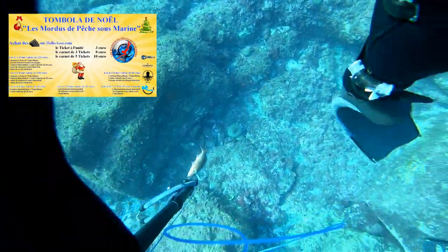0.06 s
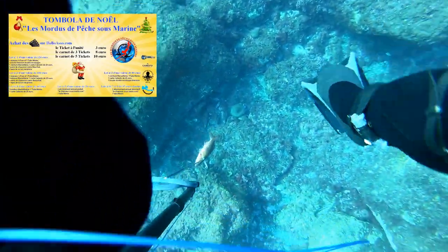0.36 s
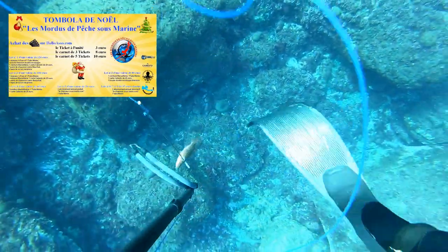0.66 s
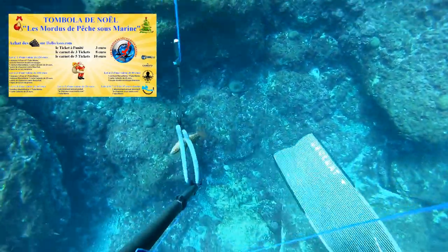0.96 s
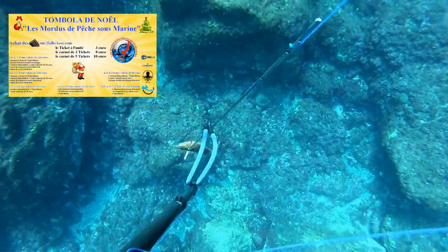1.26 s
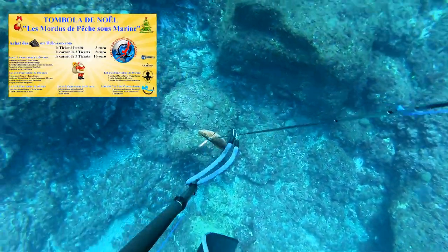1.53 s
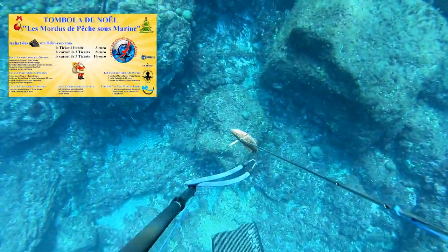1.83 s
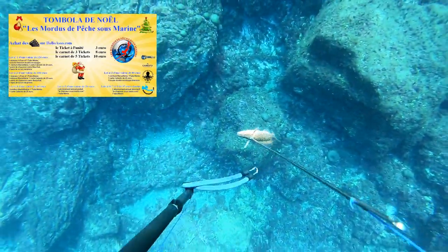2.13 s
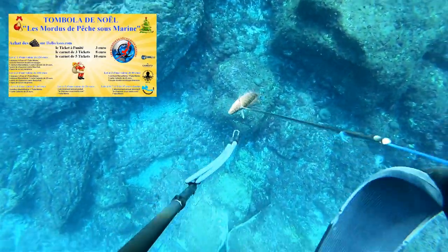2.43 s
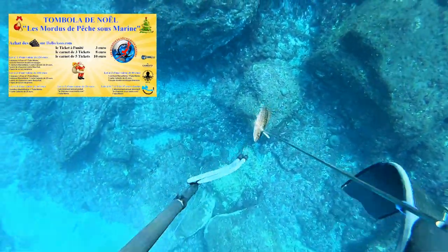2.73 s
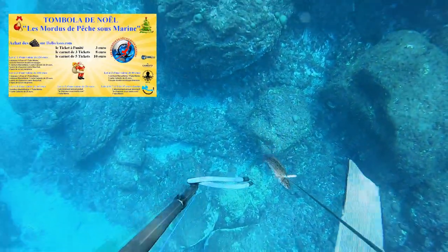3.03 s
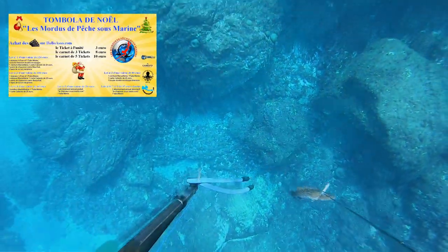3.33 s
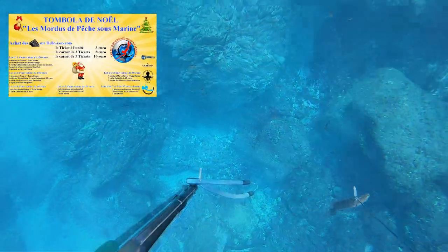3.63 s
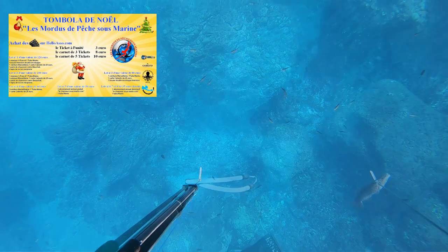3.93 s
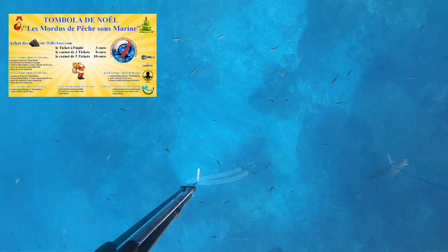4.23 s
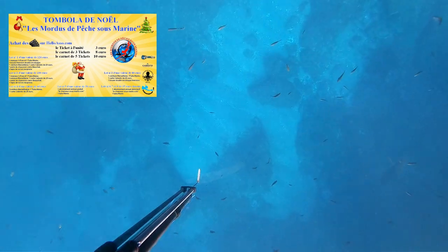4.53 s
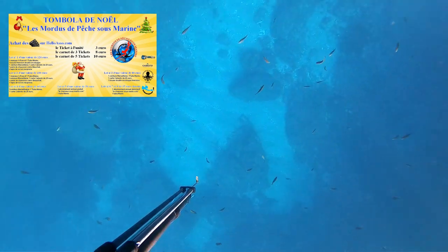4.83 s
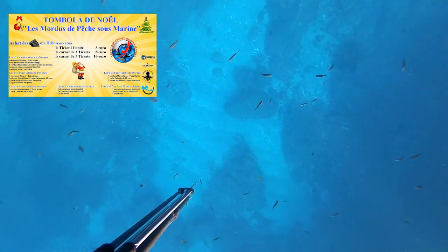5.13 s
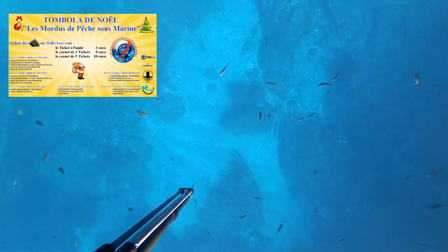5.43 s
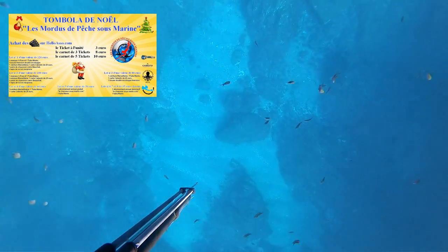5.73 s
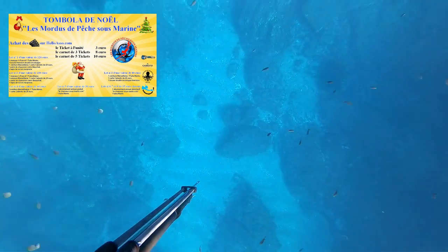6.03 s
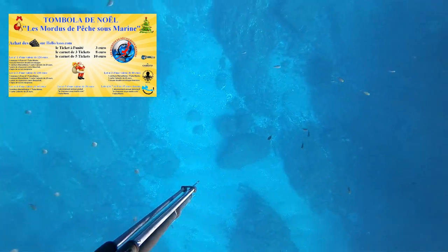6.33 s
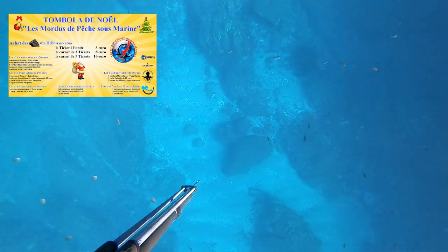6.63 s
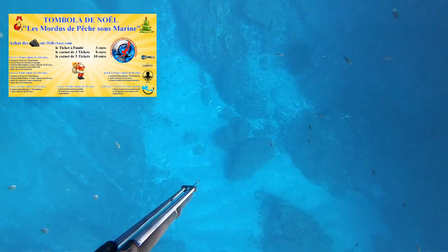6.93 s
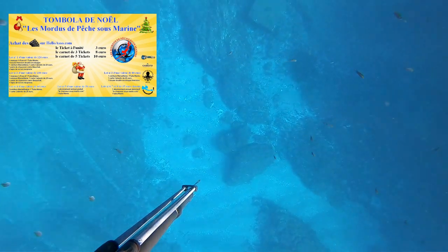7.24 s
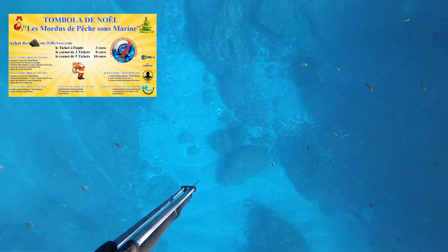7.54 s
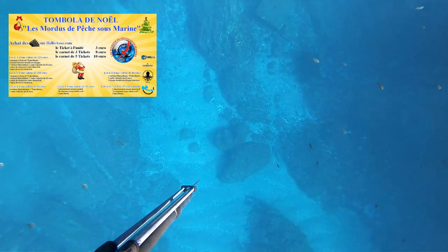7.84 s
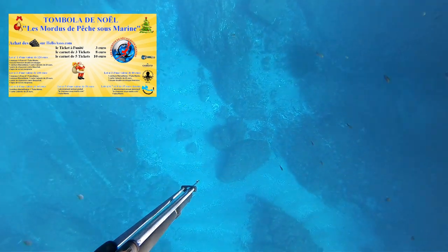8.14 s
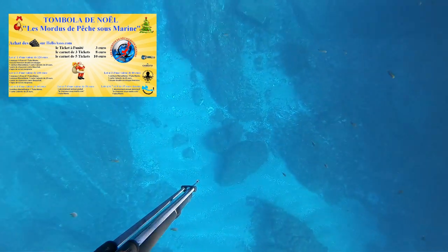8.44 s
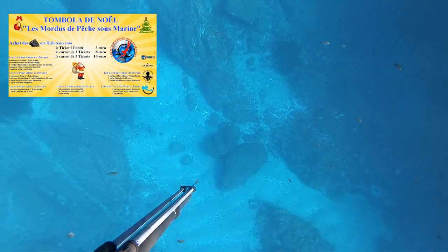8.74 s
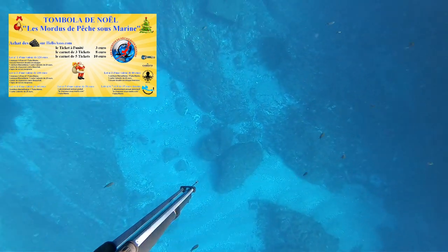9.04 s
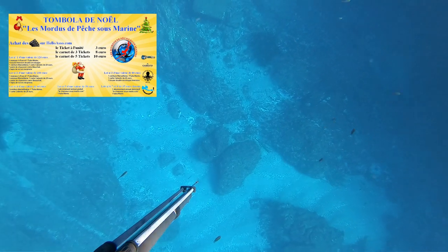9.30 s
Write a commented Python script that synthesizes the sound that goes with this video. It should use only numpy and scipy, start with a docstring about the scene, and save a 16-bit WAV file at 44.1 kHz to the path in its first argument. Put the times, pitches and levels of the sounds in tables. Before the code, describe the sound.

The sound is heard underwater by a reef, from inside a rising diver's sealed camera housing. A deep, muffled water rumble runs throughout, surging at about 0.3 and 1.4 seconds. Gear knocks and scrapes on the case in the first half second, again near 1 second and at 3.6. Pockets of air glug past, thickest from 1 to 2 seconds. A speargun line rasps and whirrs faintly from 0.5 to about 3 seconds. Between 2 and 3 seconds the sound opens from near mono into stereo, and distant snapping shrimp begin to crackle, strongest around 5 seconds, with sharp nearby snaps standing out. Soft froth sloshes close by, and from 4 seconds small bubbles pop, blip and ring. After one more shove of water at 5.4 seconds the rumble eases, swelling briefly near 8, while crackle and bubbles continue until the end, just past 9 seconds.

```python
"""Under the sea by a reef, heard from the two microphone ports of a rising diver's sealed camera housing.
Right on the case, water rumbles, gear knocks and scrapes, pockets of air glug past and a speargun
line rasps as it runs out. Close by, froth sloshes and small bubbles ring as they break free.
Farther off, snapping shrimp crackle as their cavities collapse, with single near snaps standing out.
The sound starts almost mono and opens into stereo."""
import sys
import numpy as np
from scipy import signal
from scipy.fft import rfft, irfft, next_fast_len
from scipy.io import wavfile
from scipy.ndimage import uniform_filter1d

SR = 44100
rng = np.random.default_rng(int(sys.argv[2]) if len(sys.argv) > 2 else 0)


def generate_wav(sig):
    """Save sig (samples, or channels by samples) to the path in sys.argv[1] as 16-bit PCM at SR."""
    pcm = np.round(np.clip(np.atleast_2d(sig).T, -1, 1) * 32767).astype(np.int16)
    wavfile.write(sys.argv[1], SR, pcm)


N = 413216
TIME = np.arange(N) / SR


def amp(db):
    """Decibels to gain."""
    return 10 ** (np.asarray(db) / 20)

def unit(x):
    """Scales to rms 1."""
    return x / np.sqrt(np.mean(x ** 2) + 1e-20)

def read(points, hz):
    """Reads a spectrum on a log-frequency axis."""
    f, value = np.transpose(points)
    return np.interp(np.log(hz + 1), np.log(f + 1), value)

def follow(curve):
    """A (time, value) curve at every sample."""
    return np.interp(TIME, *np.transpose(curve))

def add(mix, s, sound):
    """Adds a sound into the mix at time s."""
    part = mix[..., max(round(s * SR), 0):][..., :sound.shape[-1]]
    part += sound[..., :part.shape[-1]]

def colour(x, points):
    """Causal filter with the given spectrum, so that clicks ring after their onset only."""
    log_gain = np.log(amp(read(points, abs(np.fft.fftfreq(8192, 1 / SR)))))
    taps = np.fft.ifft(np.exp(np.conj(signal.hilbert(log_gain)))).real[:4096]
    return signal.oaconvolve(x, taps.reshape((1,) * (x.ndim - 1) + (-1,)), axes=-1)[..., :x.shape[-1]]

def butter(order, hz, kind="low"):
    """Butterworth filter sections."""
    return signal.butter(order, hz, kind, fs=SR, output="sos")

def band(x, hz, spread, order=2):
    """A broad resonance from hz / spread to hz * spread."""
    return signal.sosfilt(butter(order, [hz / spread, min(hz * spread, SR / 2 - 1)], "band"), x)

def resonate(x, hz, width_hz, stages=1):
    """Resonances of gain 1, in series, that follow the curve hz."""
    turn = np.exp(2j * np.pi * np.cumsum(hz) / SR)
    pole = np.exp(-np.pi * width_hz / SR)
    for _ in range(stages):
        x = 2 * (turn * signal.lfilter([1 - pole], [1, -pole], x / turn + 1e-18)).real
    return x

def clicks(per_s, spread_db):
    """Random impulses; a few are much larger, or smaller if spread_db is negative."""
    size = amp(spread_db * np.minimum(rng.exponential(1, N), 4.5))
    return size * rng.choice([-1, 1], N) * (rng.random(N) < per_s / SR)

def shower(sound, per_s, spread_db):
    """Repeats a sound at random times and strengths."""
    return signal.oaconvolve(clicks(per_s, spread_db), sound)[:N]

def steadied(x, seconds):
    """Evens out the slow swells of a noise."""
    return x / np.sqrt(abs(uniform_filter1d(x ** 2, int(seconds * SR))) + 1e-12)

def waver(per_s, depth_db):
    """A gain that wanders at random."""
    knots = rng.standard_normal(2000)
    return amp(depth_db * np.interp(TIME * per_s, np.arange(len(knots)), knots))

def bursts(rows, rise_s, fall_s):
    """A gain that swells to each (time, level) peak and dies away."""
    return sum(amp(db) * np.exp(-np.maximum((s - TIME) / rise_s, (TIME - s) / fall_s).clip(max=60))
               for s, db in rows)

def ring(t, hz, t60, onset_s, glide=0):
    """A damped swing; its pitch slides by the share glide as it dies."""
    age = t / max(t60, .003)
    turns = hz * np.cumsum(1 + glide * (np.minimum(age, 1) - .2)) / SR
    return np.sin(2 * np.pi * turns) * 1000 ** -age * (1 - np.exp(-t / onset_s))


# flow on the housing, strong while the fins drive, dying away in the glide: (time [s], level [dB])
FLOW_LEVEL = [(0, -34), (.28, -18), (.56, -30), (.88, -31), (1.48, -24.5), (1.9, -30), (2.85, -29.5),
              (3.45, -35.5), (4.2, -31.5), (5.2, -29.5), (6.3, -34), (7.0, -41.5), (7.42, -42.5),
              (7.66, -35), (8.1, -41.5), (8.28, -30), (8.55, -43), (9.37, -42.5)]
# trapped air churning, settling once most has escaped: (time [s], level [dB])
CHURN_LEVEL = [(0, -47), (.28, -29), (.55, -50), (.73, -40), (.9, -47.5), (1.1, -37), (1.45, -34.5),
               (1.85, -48), (2.05, -35.5), (2.7, -37.5), (3.35, -47.5), (3.78, -36.5), (4.0, -41),
               (4.7, -43.5), (5.1, -37), (5.95, -44), (6.75, -63.5), (9.37, -55)]
# sudden shoves of water on the housing: (time [s], rumble [dB], churn [dB])
WATER_SHOVES = [(1.048, -32, -34), (1.439, -18, -47), (1.952, -30, -26), (2.377, -37, -32),
                (3.78, -53, -39), (5.433, -23, -70), (5.58, -48, -64), (7.951, -37.5, -55),
                (8.221, -39, -38), (8.576, -38.5, -41), (8.799, -54, -36)]
# deep swell, eddies and churn at the microphones: (frequency [Hz], level [dB])
SWELL_SPECTRUM = [(10, -6.5), (22, -3.5), (32, -10.5), (45, -8.5), (62, -11), (90, -44.5), (250, -79.5),
                  (800, -95)]
EDDY_SPECTRUM = [(26, -17.5), (44, 11), (75, 7), (105, -11.5), (250, -26), (800, -60.5)]
CHURN_SPECTRUM = [(50, -34), (85, 0), (125, -1), (150, -2), (190, -15), (250, -26), (320, -18.5),
                  (450, -38.5), (1000, -86)]
# note of the trapped air, sinking as it swells on the way up: (time [s], pitch [Hz])
AIR_PITCH = [(0, 150.6), (4.4, 138), (4.9, 108), (5.9, 108), (7.3, 97.5), (9.3, 89)]
# its second resonance: (time [s], level [dB])
AIR_OVERTONE = [(0, -16), (1.4, -17), (2.8, -16), (4.2, -17), (5, -24), (6.3, -21), (9.3, -22)]

def flow(rumble_db=-4, churn_db=-4, note_db=-5, overtone_ratio=1.607, swell_top_hz=46, muffle_hz=1800):
    """Water presses on the case; faster flow sheds more eddies, and shaken air hums at its own note."""
    times, push_db, shake_db = np.transpose(WATER_SHOVES)
    rise_s, fall_s = 0.0097, 0.021
    speed = amp(follow(FLOW_LEVEL)) + bursts(zip(times, push_db), rise_s, fall_s)
    shake = amp(follow(CHURN_LEVEL)) * waver(per_s=13, depth_db=4)
    shake += bursts(zip(times, shake_db), rise_s, fall_s)
    swell = steadied(colour(rng.standard_normal(N), SWELL_SPECTRUM), 0.09)
    swell = signal.sosfilt(butter(4, swell_top_hz), swell)
    eddies = steadied(colour(rng.standard_normal(N), EDDY_SPECTRUM), 0.32)
    eddy_db = -4 + 2 * np.minimum(20 * np.log10(speed) + 29.8, 2)
    rumble = (swell + eddies * amp(eddy_db)) * speed * amp(rumble_db)
    note_hz = follow(AIR_PITCH)
    churn = steadied(colour(clicks(per_s=110, spread_db=2), CHURN_SPECTRUM), 0.21)
    note = resonate(colour(clicks(per_s=80, spread_db=-2), CHURN_SPECTRUM), note_hz, width_hz=18)
    overtone = resonate(clicks(per_s=53, spread_db=3.5), overtone_ratio * note_hz, width_hz=60, stages=2)
    air = amp(churn_db) * churn + amp(note_db) * steadied(note, 0.054)
    air += amp(follow(AIR_OVERTONE)) * steadied(overtone, 0.51)
    return signal.sosfilt(butter(2, muffle_hz), rumble + air * shake)


# gear striking the case itself, and at 5.85 s a thump of air gulping at the housing: (time [s], level [dB],
# centre [Hz], crack t60 [s], thud [dB])
GEAR_KNOCKS = [(0.159, -29.5, 1800, 0.013, -16), (0.2206, -22, 1370, 0.075, -40.5),
               (0.2197, -16, 740, 0.027, -7.5), (0.234, -43, 2580, 0.02, -40),
               (0.2729, -23, 1560, 0.034, -27), (0.282, -17, 1620, 0.03, -28),
               (0.4727, -30, 2770, 0.034, -60), (1.026, -18.5, 2090, 0.042, -44),
               (1.455, -32, 2220, 0.016, -50), (1.493, -28, 2500, 0.015, -50),
               (1.5885, -32, 810, 0.05, -44), (2.275, -29, 1320, 0.017, -26),
               (2.365, -28.5, 1410, 0.016, -21), (3.606, -17.5, 1170, 0.063, -34),
               (5.006, -31.5, 674, 0.049, -47), (5.854, -22.5, 245, 0.0023, -29)]
# the pitches a knock rings at, from a low clunk to a bright clink: (frequency [Hz], level [dB])
KNOCK_MODES = [(334, -5), (619, 1), (790, -3), (1152, -2), (1314, -3.5), (1470, -3), (2070, -5.5),
               (2401, -10.5), (2756, -7), (3774, -5)]
# gear rubbing on the case: (peak time [s], level [dB], centre [Hz], rise [s], fall [s])
GEAR_SCRAPES = [(.11, -49.5, 289, 0.3, 0.17), (0.135, -36.5, 600, 0.0045, 0.0089),
                (.125, -50, 1800, .003, .025), (0.231, -33, 265, 0.0015, 0.01),
                (0.28, -32.5, 2120, 0.016, 0.014), (.283, -38.5, 810, 0.02, 0.027),
                (.285, -41, 7500, 0.013, 0.022), (.755, -47, 3430, 0.058, 0.03),
                (.33, -50.5, 1240, 0.063, 0.08), (.995, -42.5, 1150, 0.0046, 0.043),
                (1.1, -38, 3340, 0.03, 0.022), (1.375, -30, 4500, 0.0045, 0.004),
                (1.588, -38.5, 2450, 0.0028, 0.0072), (2.051, -37.5, 3320, 0.0064, 0.027)]
# the wall muffles the gear on its way to the microphones: (frequency [Hz], gain [dB])
HOUSING_WALL = [(20, 12), (3000, -3.5), (6000, -12.5), (10000, -17.5), (15000, -44.5)]

def gear(thud_hz=46, crack_db=-5, ring_db=-2, ring_stretch=1.56, grit_db=-30):
    """Knocks crack, ring near their own pitch and rock the case on its mount; scrapes are tiny slips."""
    out, t = np.zeros(N), np.arange(SR // 2) / SR
    for s, db, hz, t60, thud_db in GEAR_KNOCKS:
        crack = band(rng.standard_normal(len(t)) * 1000 ** (-t / t60), hz, spread=1.223)
        modes = np.zeros(len(t))
        for mode_hz, mode_db in KNOCK_MODES:
            nearness = np.exp(-(np.log(mode_hz / hz) / 0.43) ** 2)
            swing = ring(t, mode_hz, t60 * ring_stretch, onset_s=0.000047)
            modes += rng.choice([-1, 1]) * amp(mode_db) * nearness * swing
        add(out, s, amp(db + crack_db) * crack / abs(crack).max())
        add(out, s, amp(db + ring_db) * modes / abs(modes).max())
        add(out, s, amp(thud_db) * ring(t, thud_hz, t60=0.22, onset_s=0.029))
    for s, db, hz, rise_s, fall_s in GEAR_SCRAPES:
        slips = clicks(per_s=8400, spread_db=-3)
        rub = unit(band(slips, hz, spread=1.82, order=4))
        grit = unit(band(slips, 2 * hz, spread=1.6))
        out += bursts([(s, db)], rise_s, fall_s) * (rub + amp(grit_db) * grit)
    return colour(out, HOUSING_WALL)


# air breaking loose at the housing: (time [s], smack [dB], boom [dB], smack pitch [Hz], throat [dB])
SINGLE_GULPS = [(0.2256, -22, -18, 510, -12), (.336, -38, -23.5, 604, -27), (0.852, -28, -49, 710, -36),
                (1.039, -34, -18, 725, -46), (1.2, -35, -23, 500, -19.5), (1.214, -29.5, -15.5, 650, -22.5),
                (1.247, -36, -50, 800, -40), (1.289, -24.5, -19, 730, -33.5),
                (1.351, -27.5, -20.5, 670, -20), (1.4268, -21, -12.5, 730, -24),
                (1.455, -25.5, -24, 664, -24), (1.5, -33, -15.5, 500, -35), (1.542, -24.5, -15, 740, -34),
                (1.554, -39, -14.5, 650, -19), (1.572, -30, -30.5, 690, -31), (1.588, -22, -24.5, 684, -32),
                (1.618, -34, -20.5, 560, -28), (1.655, -38, -21, 710, -26), (1.698, -35, -35, 600, -45),
                (1.724, -33, -15.5, 504, -30), (1.743, -26, -25.5, 960, -39), (1.76, -26, -34, 692, -36),
                (1.946, -33.5, -33, 696, -34), (1.998, -29, -19.5, 690, -26), (2.018, -28, -46, 690, -40),
                (2.275, -26, -51, 740, -53), (2.367, -18, -24.5, 724, -22.5), (3.609, -30, -21, 590, -25),
                (3.633, -21, -26, 600, -32), (3.753, -51, -26, 600, -26)]
# quick runs of gulps: (time [s], length [s], first gap [s], gap to last gap [ratio], smack [dB],
# boom [dB], swell [dB/s], smack pitch [Hz])
GULP_RUNS = [(0.596, .122, .016, 1.06, -28.5, -18.5, 94, 472), (3.515, .087, .019, .87, -24, -35, 15, 554)]
# the pocket of air against the housing: (frequency [Hz], level [dB], share of the boom's t60 [ratio])
POCKET_MODES = [(145.2, -4.5, 0.97), (50.6, -13, 0.91), (236, -10.5, 0.078), (302, -13, 0.15)]

def glugs(smack_db=-1, spray_db=-17, boom_db=3, boom_lag_s=0.00353, single_t60=0.22, throat_hz=320.5):
    """A neck of water shuts with a smack and a little spray; it gargles and the air behind it booms."""
    out, t = np.zeros(N), np.arange(SR // 3) / SR
    gulps = [(s, hit_db, hz, 0.043, low_db, single_t60, throat_db)  # alone, the smack slides upward
             for s, hit_db, low_db, hz, throat_db in SINGLE_GULPS]
    run_chirp, run_t60 = -0.057, 0.042  # in a run, the smack sags and the boom is cut short
    for s, length, gap, ratio, hit_db, low_db, swell, hz in GULP_RUNS:
        ages = np.append(0, np.cumsum(gap * ratio ** np.arange(12)))
        for age in ages[ages < length]:
            up_db = swell * age
            gulps.append((s + age, hit_db + 0.55 * up_db, hz, run_chirp,
                          low_db + up_db, run_t60, low_db + up_db - 17))
    for s, hit_db, hz, chirp, low_db, t60, throat_db in gulps:
        pocket_tune, slow, smack_tune, throat_tune = rng.normal(1, [.03, .2, .04, .1])
        smack_s, smack_hz = 0.0011, hz * smack_tune
        age = t / (smack_s * slow)
        slide = 1 + chirp * (np.minimum(age, 4) / 2 - 1)
        smack = age ** 2 * np.exp(2 - 2 * age) * np.sin(2 * np.pi * smack_hz * t * slide)
        smack += amp(-10) * ring(t, smack_hz, 0.03 * t60 / single_t60, smack_s)
        spray = unit(band(rng.standard_normal(len(t)), 2 * hz, spread=1.7)) * np.exp(-t / 0.014)
        gargle = ring(t, throat_hz * throat_tune, t60=0.058, onset_s=0.006, glide=-.2)
        boom = sum(amp(db) * ring(t, mode_hz * pocket_tune, t60 * share, onset_s=0.0017)
                   for mode_hz, db, share in POCKET_MODES)
        add(out, s, amp(hit_db) * (amp(smack_db) * smack + amp(spray_db) * spray))
        add(out, s, amp(throat_db) * gargle)
        add(out, s + boom_lag_s, -amp(low_db + boom_db) * boom)
    return colour(out, [(50, 4.5), (850, 0), (1150, -12.5), (2500, -3.5), (5000, -31), (12000, -59)])


# the line running out under tension, heard through the housing: (time [s], level [dB])
LINE_LEVEL = [(.5, -70.5), (.63, -56.5), (.76, -55.5), (1.15, -49), (1.4, -49), (1.75, -52), (2.05, -49),
              (2.4, -52.5), (3.1, -58), (3.4, -100)]
# its rasp: (frequency [Hz], level [dB])
RASP_SPECTRUM = [(600, -26), (1400, -11.5), (2000, -2.5), (2500, -3), (2900, 7), (3400, -1.5), (3900, -17),
                 (5400, -25.5), (6500, -21.5), (9000, -23.5), (12000, -64.5), (16000, -82.5)]
# what it rings in the gun: (frequency [Hz], half-width of each stage [Hz], level [dB])
GUN_MODES = [(2110, 81, -19), (2820, 27, -3), (2896, 73, -7), (3140, 160, -6.5), (4190, 44, -12),
             (4590, 92, -13), (4900, 80, -18.5), (5300, 76, -14.5)]

def spear_line(level_db=-3, whirr_db=-2.5):
    """Tiny jerks of line rasp and set the gun whirring; changing tension sways strength and pitch."""
    slips = clicks(per_s=3000, spread_db=2.5) * waver(per_s=30, depth_db=3)
    drift = waver(per_s=9, depth_db=0.13)
    whirr = sum(amp(db) * unit(resonate(slips, hz * drift, 2 * half_width, stages=2))
                for hz, half_width, db in GUN_MODES)
    rasp = unit(colour(slips, RASP_SPECTRUM))
    return (rasp + amp(whirr_db) * unit(whirr)) * amp(follow(LINE_LEVEL) + level_db)


# froth streaming close past the ports: (time [s], level [dB])
FROTH_LEVEL = [(0, -65.5), (.7, -62.5), (.98, -47), (1.6, -45.5), (1.87, -54), (2.15, -44), (2.45, -54.5),
               (3.35, -56.5), (3.7, -53), (4.15, -59.5), (4.75, -52), (5.3, -44.5), (6.1, -49.5),
               (6.85, -56), (7.3, -50), (7.7, -52), (8.27, -45), (8.43, -54), (8.5, -41), (9.37, -49.5)]
# its tone: (frequency [Hz], level [dB])
FROTH_SPECTRUM = [(70, -28), (170, -0.5), (300, -9.5), (420, -5), (550, -6), (730, 9.5), (880, 6),
                  (1100, 2.5), (1500, 1), (2500, -12), (6000, -48.5)]
# weight of its large, low bubbles: (time [s], gain [dB])
FROTH_BASS = [(.9, -1.5), (2.2, 10.5), (4.5, 1.5), (5.6, -5.5), (7.8, -5), (8.3, 10), (8.52, -3.5),
              (9.1, 5)]
# sloshes that throw off a burst of froth: (time [s], level [dB])
FROTH_SLOSHES = [(1.976, -40.5), (2.22, -45), (2.579, -43), (3.771, -41.5), (4.409, -41.5), (4.881, -43.5),
                 (5.019, -35.5), (6.42, -41.5), (7.29, -46.5), (7.856, -37.5), (8.007, -42.5), (8.492, -44)]

def froth(level_db=-1, wash_db=-3, cycles=16, bass_hz=540):
    """Crowded bubbles damp each other within a few cycles: a rough slosh over a soft wash."""
    t = np.arange(SR // 15) / SR
    blips = np.zeros(N)
    for hz in np.geomspace(260, 2200, 22):
        blip = ring(t, hz, cycles / hz, onset_s=0.001, glide=0.49)
        blips += shower(blip, per_s=36, spread_db=1.9) * np.sqrt(hz)
    wash = amp(wash_db) * rng.standard_normal((2, N))
    slosh = unit(colour(unit(blips) + wash, FROTH_SPECTRUM))
    slosh += (amp(follow(FROTH_BASS)) - 1) * signal.sosfiltfilt(butter(3, bass_hz), slosh)
    stream = amp(follow(FROTH_LEVEL)) * waver(per_s=14, depth_db=1.5)
    surges = bursts(FROTH_SLOSHES, rise_s=0.01, fall_s=0.028)
    return ports(*slosh * amp(level_db) * (stream + surges))


def snap(rattle_db, rattle_s, tail_db, tail_s, ring_hz, ring_db, ring_t60=0.014):
    """A cavity collapses: a spike, a brief rebound, a rattle in the case, duller scatter from rocks."""
    t = np.arange(SR // 12) / SR
    rattle, scatter = rng.standard_normal((2, 2, len(t)))
    shape = amp(rattle_db) * rattle * np.exp(-t / rattle_s)
    shape += amp(tail_db) * band(scatter, 2270, spread=2.76) * np.exp(-t / tail_s)
    shape[0] += amp(ring_db) * np.cos(2 * np.pi * ring_hz * t) * 1000 ** (-t / ring_t60)
    shape[0, 0] += 1
    return shape

def tilted(x, treble_db, low_db):
    """Sets a snap's treble and low mids against its body."""
    return colour(x, [(1500, low_db), (2300, 0), (3800, 0), (6000, treble_db)])


# distant reef crackle, opening out as the diver clears the rocks: (time [s], level [dB])
REEF_LEVEL = [(0, -72), (.5, -74), (1.1, -63), (2.1, -60), (2.6, -53.5), (4.05, -52.5), (4.6, -45.5),
              (5.25, -43), (5.6, -46.5), (6.2, -50), (6.7, -46.5), (7.75, -51), (7.97, -46.5), (8.3, -53),
              (8.64, -46.5), (8.85, -51.5), (9.37, -51.5)]
# its crispness, greater when snaps arrive head-on: (time [s], treble gain [dB])
REEF_CRISPNESS = [(0, 21), (2.6, 0), (4.2, 6), (5.2, 1), (9.37, 1)]
# snaps at the microphones, and the fizz of the faintest: (frequency [Hz], level [dB])
SNAP_SPECTRUM = [(200, -25), (750, -14), (1100, -4), (1500, -5.5), (2000, -2), (2550, 4), (3200, 0),
                 (4100, -7.5), (4900, -10.5), (5400, -4.5), (7000, -14), (10000, -19), (13000, -34.5),
                 (16000, -45)]
FIZZ_SPECTRUM = [(1500, -19.5), (3500, 8.5), (6000, -13), (8500, 3.5), (10500, -12), (13000, -11.5),
                 (15500, -26)]

def far_shrimp(level_db=-1.5, hiss_db=-3, fizz_db=-21, vary_db=5, treble_hz=4300):
    """Distant snaps of many pitches and colours merge into a carpet with a fine fizz on top."""
    shapes = []
    for hz in np.geomspace(1400, 4000, 20):
        shape = snap(rattle_db=-18, rattle_s=.0006, tail_db=-33, tail_s=.01, ring_hz=hz, ring_db=-21)
        shapes.append(tilted(shape, *vary_db * rng.uniform(-1, 1, 2)))
    carpet = sum(signal.oaconvolve(clicks(per_s=14, spread_db=4)[None], shape, axes=1)[:, :N]
                 for shape in shapes)
    hiss = amp(hiss_db) * rng.standard_normal((2, N))
    crackle = unit(colour(unit(carpet) + hiss, SNAP_SPECTRUM))
    ticks = np.array([clicks(per_s=900, spread_db=3.8) for _ in range(2)])
    crackle += amp(fizz_db) * unit(colour(ticks, FIZZ_SPECTRUM))
    treble = signal.sosfiltfilt(butter(2, treble_hz, "high"), crackle)
    crackle += (amp(follow(REEF_CRISPNESS)) - 1) * treble
    return ports(*crackle * amp(follow(REEF_LEVEL) + level_db) * waver(per_s=18, depth_db=1.84))


# shrimp near the microphones: (time [s], level [dB], treble tilt [dB], low-mid tilt [dB])
NEAR_SNAPS = [(1.663, -43, -9, 3), (1.801, -54.5, 10.5, -5), (2.0227, -40, -12, -22),
              (2.1906, -41.5, -17, 6), (2.403, -40.5, 2, -11), (2.547, -44, 4, 7), (2.7021, -38, -13, 3.5),
              (2.8489, -40.5, -10, 12), (2.865, -44, -25, 6.5), (2.983, -44.5, -16, 6),
              (3.1655, -41, -15, 3), (3.6226, -42, 2, -3), (3.6932, -38, -9.5, 5.5),
              (3.8375, -34.5, -13, 6), (3.8754, -38.5, -8, -2), (4.258, -38.5, -0.5, 4),
              (4.3156, -37.5, -8, 5), (4.5277, -39.5, -1, 1), (4.6168, -41.5, 5.5, 3), (4.413, -41, -5, -8),
              (4.786, -38, -3, -18), (4.818, -45, 5, 10), (4.835, -40.5, 4, 5), (4.8434, -47, 4, 16),
              (4.8773, -30.5, -18, -46), (4.906, -35, -5, -8), (4.927, -48, 10, -12), (4.9652, -36, -5, 1),
              (5.025, -39.5, 1, 2), (5.078, -33, -8, -7), (5.392, -39.5, -2, 6), (5.618, -39.5, -14, -15),
              (5.6926, -35.5, -13, -34), (6.1813, -39.5, -4, -2), (6.405, -46, 4, -11), (6.4953, -41, 2, 4),
              (6.5011, -33.5, -3, 2), (6.587, -39.5, -4, 9), (6.877, -48, 1, -12), (6.9134, -30.5, -11, -5),
              (6.9608, -39, -2, -1), (7.18, -47.5, 8, -17), (7.2926, -38.5, -5, -14),
              (7.466, -31.5, -9.5, 4), (7.6672, -30, -6.5, -0.5), (7.9467, -44.5, 1, 13),
              (8.0005, -37.5, -6.5, 2), (8.4217, -33, -10, -6.5), (8.6157, -37, -10, 3),
              (8.643, -34, 0.5, -4), (8.656, -39, -4, -2), (8.9144, -42.5, -4.5, -7),
              (9.0125, -29.5, -15, -2), (9.3443, -45, -4, -4), (9.357, -38, -2, -1)]

def near_shrimp(level_db=2.5, crisp_db=3, lead_db=-15, lead_s=0.001256):
    """Single snaps stand out; each has a faint tick just ahead that softens its attack."""
    out = np.zeros((2, N))
    for s, db, treble_db, low_db in NEAR_SNAPS:
        shape = snap(rattle_db=-14, rattle_s=.0011, tail_db=-29, tail_s=.011, ring_hz=2670, ring_db=-30)
        shape = colour(shape, SNAP_SPECTRUM)
        attack_rms = np.sqrt(np.mean(shape[:, :SR // 250] ** 2))
        crack = amp(db + level_db) * tilted(shape, treble_db + crisp_db, low_db) / attack_rms
        add(out, s, crack)
        add(out, s - lead_s, amp(lead_db) * crack)
    return ports(*out)


# tiny bubbles pinching off closest to the ports: (time [s], level [dB], pitch [Hz])
CLOSE_POPS = [(3.377, -28.5, 2570), (4.269, -32.5, 3070), (4.6377, -25, 2800), (4.7122, -23.5, 2570),
              (4.877, -42.5, 2770), (5.0895, -25, 2590), (5.162, -29.5, 3140), (5.247, -20, 2560),
              (5.337, -31, 3140), (5.467, -27.5, 3120), (6.2, -29, 2570), (6.754, -31, 2770),
              (7.143, -33, 2980)]

def pings(level_db=-9, pop_db=2):
    """The tiniest bubbles ring high and briefly among the crackle; the closest ones pop."""
    t = np.arange(SR // 15) / SR
    rings = sum(shower(ring(t, hz, t60=0.15, onset_s=0.00067, glide=.03), per_s=4, spread_db=-0.5)
                for hz in np.geomspace(2350, 3300, 12))
    out = unit(rings) * amp(follow(REEF_LEVEL) + level_db)
    for s, db, hz in CLOSE_POPS:
        add(out, s, amp(db + pop_db) * ring(t, hz, t60=0.015, onset_s=0.00022, glide=0.038))
    return ports(out)


# single bubbles in the water nearby, and one gulp of air at 7.26 s: (time [s], level [dB], pitch [Hz], t60 [s])
FREED_BUBBLES = [(3.729, -38, 170, 0.12), (4.13, -23, 136.3, 0.11), (4.546, -27.5, 154, 0.22),
                 (4.693, -18.5, 1280, 0.049), (4.822, -16, 78, 0.16), (4.94, -25, 92, 0.23),
                 (5.055, -25.5, 90, 0.34), (5.17, -26, 113, 0.27), (5.26, -26.5, 82.3, 0.36),
                 (5.33, -26, 128, 0.17), (5.58, -29.5, 114.3, 0.21), (5.024, -26, 1470, 0.078),
                 (5.085, -30, 1040, 0.068), (5.205, -27.5, 843, 0.11), (5.23, -28, 1530, 0.051),
                 (5.283, -24, 724, 0.13), (5.373, -29.5, 865, 0.11), (5.508, -26, 695, 0.086),
                 (5.602, -31, 865, 0.082), (5.719, -22, 774, 0.06), (5.856, -17, 119.6, 0.15),
                 (5.886, -19.5, 118.6, 0.25), (6.916, -25, 1340, 0.07), (7.049, -31.5, 1780, 0.042),
                 (7.261, -21.5, 150, 0.054), (7.315, -25.5, 870, 0.074), (7.485, -27, 738, 0.089),
                 (7.843, -31, 708, 0.11), (8.008, -35, 640, 0.17), (8.342, -21, 1410, 0.028),
                 (8.785, -32.5, 772, 0.11), (8.813, -26, 187, 0.22), (8.898, -24.5, 430, 0.03),
                 (9.059, -28, 442, 0.17), (9.108, -22, 678, 0.069), (9.116, -31, 418, 0.12),
                 (9.186, -19.5, 714, 0.047)]

def bubbles(level_db=1, onset_s=0.0051, glide_spread=0.31, piece_db=-9, strays_from_s=4, strays=80):
    """Freed bubbles wobble, ring at the pitch of their size and shed pieces; strays leave the froth."""
    out, t = np.zeros(N), np.arange(SR // 4) / SR
    when, smallness, strength = rng.random((strays, 3)).T
    stray_s = strays_from_s + when * (TIME[-1] - strays_from_s)
    stray_db = np.interp(stray_s, *np.transpose(FROTH_LEVEL)) + 5 + 6 * strength
    stray_hz = 480 * 2.4 ** smallness ** 1.5
    stray_t60 = 0.069 * (1000 / stray_hz) ** 0.11  # larger bubbles ring longer
    for s, db, hz, t60 in [*FREED_BUBBLES, *zip(stray_s, stray_db, stray_hz, stray_t60)]:
        wobble = 1 + .6 * np.interp(t * hz / 2, np.arange(256), rng.standard_normal(256))
        glide = 0.15 + glide_spread * rng.uniform(-1, 1)
        add(out, s, amp(db + level_db) * wobble * ring(t, hz, t60, onset_s, glide))
        for late, detune, slide in rng.random((3, 3)):
            piece_hz = hz * np.exp(0.33 * (2 * detune - 1))
            piece = ring(t, piece_hz, t60 / 2, onset_s, 2 * glide_spread * (2 * slide - 1))
            add(out, s + late * 0.035, amp(db + piece_db) * piece)
    return ports(out)


# tiny bubbles torn off as a larger one breaks up nearby: (time [s], level [dB])
BUBBLE_SPRAYS = [(5.08, -40.5), (5.205, -33.5), (5.275, -48), (6.93, -41.5)]

def sprays(cycles=24):
    """A crowd of tiny bubbles rings out at once and thins away."""
    t = np.arange(SR // 30) / SR
    rings = sum(shower(ring(t, hz, cycles / hz, onset_s=.0003), per_s=40, spread_db=2)
                for hz in np.geomspace(1500, 4200, 14))
    return ports(unit(rings) * bursts(BUBBLE_SPRAYS, rise_s=.008, fall_s=0.038))


# between the two microphone ports: (frequency [Hz], left's phase lead [rad])
MIC_PHASE = [(380, -1.5), (520, -0.94), (700, -2), (950, -2.5), (1500, -4.5), (2100, -6.5), (3900, -8),
             (4900, -5.5), (7200, -12.5), (10000, -17.5)]
# how alike they sound: (frequency [Hz], coherence [0-1])
MIC_COHERENCE = [(200, 0.68), (900, 0.99), (1300, 0.57), (2500, 0.52), (3300, 0.72), (4500, 0.057),
                 (7000, 0.11), (15000, 0.27)]
# which is louder: (frequency [Hz], left minus right [dB])
MIC_BALANCE = [(400, 5.5), (750, -5), (1300, -5.5), (2500, -3), (3500, -1), (5500, -5), (9500, -4.5),
               (12000, -5.5)]

def ports(sound, right_only=None, bass_skew_rad=0.16):
    """The housing rocks and flexes, so above the bass the ports differ in phase and level."""
    size = next_fast_len(N + SR)
    hz = np.fft.rfftfreq(size, 1 / SR)
    apart = np.clip((hz - 340) / 140, 0, 1)
    alike = 1 - apart * np.clip(1 - read(MIC_COHERENCE, hz), 0, 1)
    balance = amp(apart * read(MIC_BALANCE, hz) / 2)
    phase = bass_skew_rad * (1 - apart) - apart * read(MIC_PHASE, hz)
    left = rfft(sound, size)
    right = alike * left * np.exp(1j * phase)
    if right_only is not None:
        right += np.sqrt(1 - alike ** 2) * rfft(right_only, size)
    return irfft(np.array([left * balance, right / balance]), size)[:, :N]

def stereo_width(start_s=1.85, opening_s=0.89):
    """Opens from mono (0) to full stereo (1)."""
    return np.clip((TIME - start_s) / opening_s, 0, 1)

def housing(x):
    """What touches the housing reaches both ports from one source."""
    return (1 - stereo_width()) * x + stereo_width() * ports(x)

def scene():
    """Close sounds on the housing, and the wider open water around them."""
    on_case = housing(flow() + glugs() + gear() + spear_line())
    return on_case + bubbles() + froth() + pings() + sprays() + far_shrimp() + near_shrimp()

def record(dry, side_floor_db=-35, top_hz=15750):
    """The stereo image opens out of near mono; then the camera's band limit."""
    mid = dry.mean(0)
    wide = mid + (dry - mid) * np.maximum(stereo_width(), amp(side_floor_db))
    band_limit = signal.firwin(511, top_hz, window=("kaiser", 9), fs=SR)
    return signal.oaconvolve(wide, band_limit[None], "same")


dry = scene()
out = record(dry)
generate_wav(out)
```